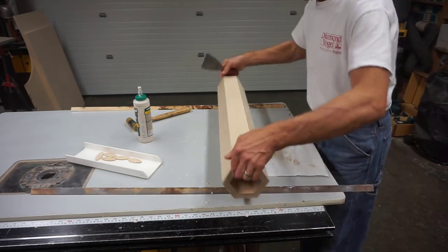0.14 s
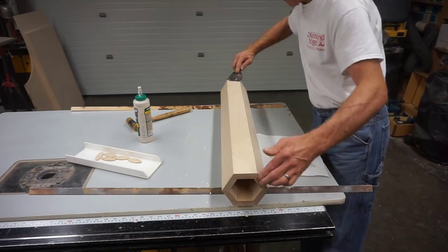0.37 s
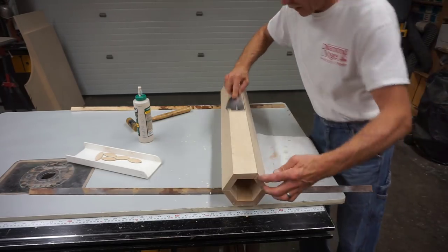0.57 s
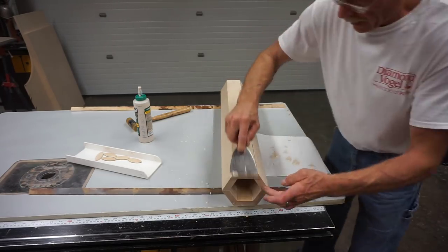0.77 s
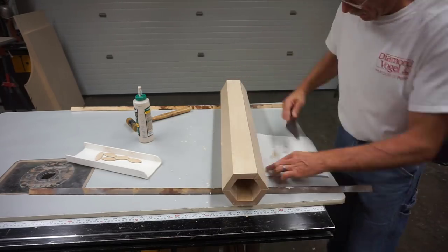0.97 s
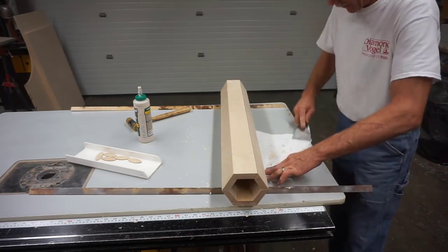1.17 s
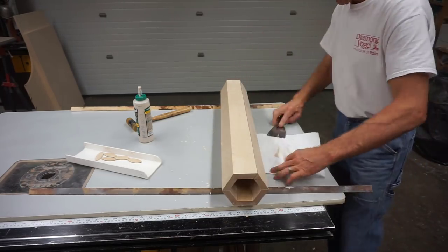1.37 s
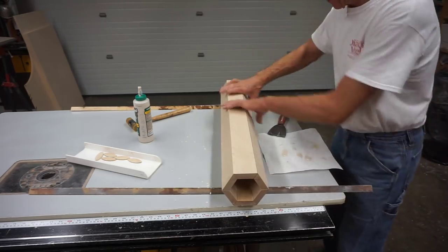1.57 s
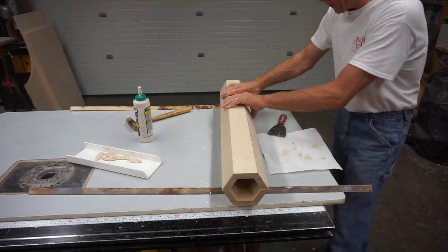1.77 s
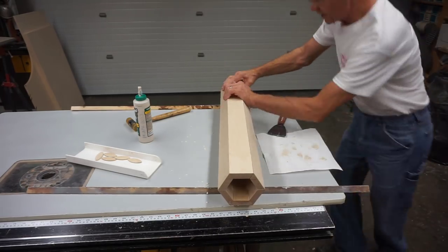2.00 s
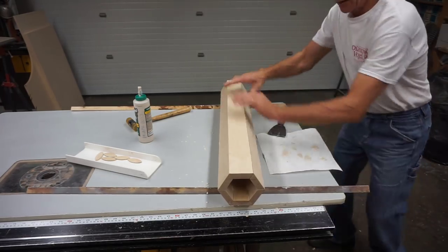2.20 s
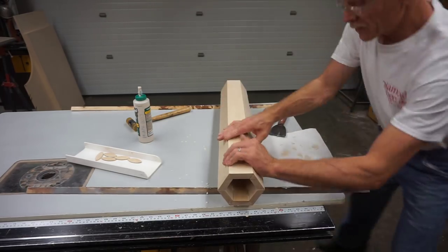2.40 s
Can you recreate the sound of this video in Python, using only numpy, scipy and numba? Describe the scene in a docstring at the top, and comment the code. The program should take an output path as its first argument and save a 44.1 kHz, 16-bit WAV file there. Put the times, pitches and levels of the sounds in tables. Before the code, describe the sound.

A putty knife scrapes along a wooden tube, then clatters down, followed by hollow knocks.

```python
"""A putty knife scrapes wet glue along a hollow wooden tube in one stick-slip stroke, after
clattering on to it. The blade is wiped on a paper towel, singing faintly, and dropped on the bench,
where the steel rings. Hands slide over the tube and roll it on to its next face with two hollow
knocks. A small workshop answers every sound with a short, dense echo, over faint hiss."""
import sys
import numpy as np
from scipy import signal
from scipy.fft import rfft, irfft, next_fast_len
from scipy.io import wavfile
from scipy.ndimage import uniform_filter1d
from numba import njit

SR = 44100
rng = np.random.default_rng(int(sys.argv[2]) if len(sys.argv) > 2 else 0)


def unload_audio(sound):
    """Save the sound as a 16-bit wav file, at the path given as the first command line argument."""
    columns = np.transpose(np.atleast_2d(sound))
    # keep every value between -1 and 1, then stretch to whole-number steps
    steps = np.round(np.clip(columns, -1, 1) * 32767)
    wavfile.write(sys.argv[1], SR, steps.astype(np.int16))


N = 108045
T = np.arange(N) / SR


def amp(db):
    """Decibels to gain."""
    return 10 ** (np.asarray(db) / 20)


def on_log(hz, points):
    """Interpolate (freq_hz, value) points on a log-frequency axis."""
    freq_hz, values = np.array(points, float).T
    return np.interp(np.log(np.maximum(hz, 1)), np.log(freq_hz), values)


def unit(x):
    """Scale to rms 1."""
    return x / np.sqrt(np.mean(x ** 2) + 1e-20)


def decay(t, t60_s):
    """Exponential fall, 60 dB in t60_s."""
    return np.exp(-np.log(1000) * t / t60_s)


def drift(per_s):
    """Smooth random drift, spread near 1."""
    hold = int(SR / per_s)
    steps = np.repeat(rng.standard_normal(N // hold + 1), hold)[:N]
    return 1.2 * uniform_filter1d(steps, hold)


def colour(x, eq):
    """Minimum-phase filter through (freq_hz, gain_db) points."""
    n = next_fast_len(2 * N)
    gain = amp(on_log(np.arange(n // 2 + 1) * SR / n, eq))
    cepstrum = irfft(np.log(gain), n)
    cepstrum[1:n // 2] *= 2
    cepstrum[n // 2 + 1:] = 0
    return irfft(rfft(x, n) * np.exp(rfft(cepstrum)), n)[:N]


@njit
def resonance(x, centre_hz, width_hz):
    """Band-pass with a moving centre, unity peak gain."""
    out, band_state, low_state = np.empty(len(x)), 0., 0.
    for i in range(len(x)):
        g = np.tan(np.pi * centre_hz[i] / SR)
        damping = width_hz / centre_hz[i]
        band = (band_state + g * (x[i] - low_state)) / (1 + g * (g + damping))
        band_state = 2 * band - band_state
        low_state += 2 * g * band
        out[i] = damping * band
    return out


def ring(strikes, modes):
    """Damped modes excited by each (start_s, level_db) strike."""
    t, out = T[:SR // 2], np.zeros(N + SR)
    for start_s, level_db in strikes:
        i = int(start_s * SR)
        for hz, mode_db, t60_s in modes:
            out[i:i + len(t)] += amp(level_db + mode_db) / 10 * np.cos(2 * np.pi * hz * t) * decay(t, t60_s)
    return out[:N]


def contact(start_s, level_db, crack_s, snap=0.34):
    """One blow: a sharp snap and a brief, spectrally flat crack."""
    t = T[:SR // 20]
    crack = rng.standard_normal(len(t)) * np.exp(-t / crack_s)
    crack[0] += snap * np.linalg.norm(crack)
    for _ in range(3):  # whiten, then shorten again
        spectrum = rfft(crack)
        crack = irfft(spectrum / abs(spectrum), len(t)) * np.exp(-(t / (4 * crack_s)) ** 2)
    return amp(level_db) * np.pad(crack / np.linalg.norm(crack), (int(start_s * SR), N))[:N]


def blows(rows, crack_s, body_hz=900, bright_hz=5500, treble_hz=10000):
    """Contacts, each with its own body and treble shelves."""
    out = 0
    for start_s, level_db, body_db, treble_db, *_ in rows:
        shelves = [(body_hz, body_db), (2000, 0), (bright_hz, 0), (treble_hz, treble_db)]
        out += colour(contact(start_s, level_db, crack_s), shelves)
    return out


def slips(per_s, spread_db):
    """Friction: a dense train of tiny, uneven slips."""
    impulses = (rng.random(N) < per_s / SR) * rng.standard_normal(N)
    return unit(impulses * amp(spread_db * np.minimum(rng.exponential(size=N), 4)))


def rubbing(moves, eq):
    """Soft friction that swells and fades with each move."""
    power = 0
    for peak_s, rise_s, fall_s, level_db in moves:
        swell = np.exp(-np.where(T < peak_s, ((T - peak_s) / rise_s) ** 2, (T - peak_s) / fall_s))
        power += (amp(level_db) * swell) ** 2
    return unit(colour(slips(per_s=3500, spread_db=1.5), eq)) * np.sqrt(power)


# towel wipes: peak_s, rise_s, fall_s, level_db
TOWEL_WIPES = [(.02, 0.11, 0.067, -59.5), (.084, 0.0056, 0.01, -47.5), (.965, 0.043, 0.13, -60),
               (1.135, 0.016, 0.12, -54), (1.229, 0.02, 0.015, -40), (1.368, 0.02, 0.023, -43),
               (1.61, 0.034, 0.05, -55), (1.795, 0.018, 0.046, -48)]
# paper spectrum: freq_hz, gain_db
PAPER_EQ = [(100, -75), (300, -32.5), (1100, -11.5), (2000, -5.5), (3200, -7), (6500, -1), (10000, -2),
            (15000, -4.5)]
def towel_wipes():
    """Paper towel rustles under the blade."""
    return rubbing(TOWEL_WIPES, PAPER_EQ)


# hand moves: peak_s, rise_s, fall_s, level_db
HAND_RUBS = [(.10, 0.042, 0.016, -54.5), (.148, 0.018, 0.0066, -51), (1.12, 0.015, 0.0094, -45.5),
             (1.652, 0.024, 0.047, -49.5), (1.89, 0.015, 0.035, -43), (1.95, 0.016, 0.017, -47.5),
             (2.01, 0.012, 0.038, -47.5), (2.21, 0.019, 0.029, -49.5), (2.374, 0.02, 0.0093, -49)]
# skin-on-wood spectrum: freq_hz, gain_db
HAND_EQ = [(100, -36), (250, -15.5), (620, -2), (950, 8.5), (1400, -1), (3000, -3), (6500, -1), (10000, -7),
           (15000, -7.5)]
def hand_rubs():
    """Hands slide over the tube and the bench."""
    return rubbing(HAND_RUBS, HAND_EQ)


# blade strikes on the tube: start_s, level_db
CLATTER = [(0.2363, -3), (0.2434, 3), (.2456, 7), (0.25, 2), (.269, -1.5), (.277, 0.5), (.288, -1)]
# tube wall modes: pitch_hz, level_db, t60_s
WALL_MODES = [(392, -38, .18), (578, -40, .2), (636, -41, .22), (838, -37, .25), (1005, -37, .2),
              (1895, -33, .15)]
# steel-on-tube spectrum: freq_hz, gain_db
CLATTER_EQ = [(60, -23), (310, -20.5), (400, -7.5), (470, -16), (620, -4), (1000, -0.5), (3500, -4.5),
              (6000, -2), (9000, -7), (15000, -10)]
def blade_on_tube():
    """Steel clatters on the wood and rings the tube."""
    cracks = sum(contact(*hit, crack_s=0.00483, snap=0.084) for hit in CLATTER)
    return colour(cracks + ring(CLATTER, WALL_MODES), CLATTER_EQ)


# edge catches: start_s, pitch_hz, level_db, t60_s
EDGE_PINGS = [(.3755, 2480, -27, .045), (1.349, 1555, -45, .09), (1.349, 1990, -46, .1)]
def blade_pings(width_hz=110.):
    """The edge catches and the steel chatters in a short, rough ring."""
    out = 0
    for start_s, pitch_hz, level_db, t60_s in EDGE_PINGS:
        centre_hz = np.full(N, float(pitch_hz))
        band = resonance(rng.standard_normal(N), centre_hz, width_hz)
        chatter = unit(resonance(band, centre_hz, width_hz))
        out += amp(level_db) * chatter * (T > start_s) * decay(abs(T - start_s), t60_s)
    return colour(out, [(200, -48), (1400, -2.0)])


# scraping stroke: time_s, steel_db, glide_hz, wood_db
STROKE_PATH = [(0.384, -64, 5700, -70), (0.44, -41, 5750, -71), (.54, -33.5, 6000, -66),
               (.60, -34, 6060, -55.5), (0.633, -28.5, 6500, -55), (.68, -32.5, 6900, -57.5),
               (.735, -35, 6830, -70.5), (.77, -32, 7330, -58), (0.809, -35.5, 7300, -56.5),
               (0.831, -30.5, 6850, -47.5), (0.846, -60, 7600, -57)]
# blade resonances: start_hz, width_hz, gain_db, rise_share_per_s
BLADE_PEAKS = [(2050, 130, 2, 0), (2480, 240, 2, -.1), (4700, 260, 2, .22), (7900, 260, 5, .1),
               (12750, 450, 8, .08)]
# scraping steel spectrum: freq_hz, gain_db
STEEL_EQ = [(100, -76), (1300, -13.5), (2100, -2), (3700, -2), (8000, 1.5), (15500, 4)]
# rasping wood spectrum: freq_hz, gain_db
WOOD_EQ = [(130, -50), (400, -8.5), (540, -16), (930, 2.5), (6000, -31)]
def scrape(grit_db=1.3, flicker_db=2.8, wander_share=.015, glide_db=16):
    """The edge sticks and slips over gritty glue, driving blade and wood, then flicks off the end."""
    time_s, steel_db, glide_hz, wood_db = np.array(STROKE_PATH).T
    grit = amp(grit_db * drift(per_s=350))
    edge = slips(per_s=12000, spread_db=0.5) * grit
    elapsed_s = np.clip(T, time_s[0], time_s[-1]) - time_s[0]
    wavering = 0
    for start_hz, width_hz, gain_db, rise in BLADE_PEAKS:
        gain = amp(gain_db + flicker_db * drift(per_s=28))
        centre_hz = start_hz * (1 + rise * elapsed_s + wander_share * drift(per_s=28))
        wavering += gain * resonance(edge, centre_hz, float(width_hz))
    # one resonance sings out and climbs
    fade_in = np.interp(T, [0.6, 0.69], [0, 1])
    glide = amp(glide_db) * fade_in * resonance(edge, np.interp(T, time_s, glide_hz), width_hz=280.)
    steel = unit(colour(edge + wavering + glide, STEEL_EQ)) * amp(np.interp(T, time_s, steel_db))
    wood = unit(colour(edge, WOOD_EQ)) * amp(np.interp(T, time_s, wood_db))
    flick = colour(contact(start_s=.8305, level_db=-4, crack_s=0.005), STEEL_EQ)
    return (steel + wood) * (T > time_s[0]) * (T < time_s[-1]) + flick


# soft knock spectrum: freq_hz, gain_db
PRESS_EQ = [(230, -16), (380, 1.5), (520, -7), (1100, -2), (2000, 2), (15000, -9.5)]
def blade_press():
    """The blade is pressed on to the towel with a soft knock."""
    return colour(contact(start_s=1.0864, level_db=-11.5, crack_s=0.0027), PRESS_EQ)


# blade tone envelope: time_s, level_db
SING_LEVELS = [(1.225, -67.5), (1.42, -68)]
def blade_sing(pitch_hz=1950, wander_hz=6):
    """Dragged over the towel, the blade sings faintly."""
    time_s, level_db = np.array(SING_LEVELS).T
    hz = pitch_hz + wander_hz * drift(per_s=28)
    tone = unit(np.sin(2 * np.pi * np.cumsum(hz) / SR))
    return tone * amp(np.interp(T, time_s, level_db)) * (T > time_s[0]) * (T < time_s[-1])


# knife strikes on the bench: start_s, level_db, body_db, treble_db
KNIFE_DROP = [(1.4219, 3, -12.5, -11.5), (1.4503, 8, -6.5, 1.5), (1.464, 1, 1, 0.5), (1.47, -0.5, 1.5, 0.5)]
# knife modes: pitch_hz, level_db, t60_s
STEEL_MODES = [(1100, -27, .1), (1567, -23, .13), (1747, -25, .16), (1946, -27, .36), (3440, -22, .12),
               (4186, -25, .15), (5535, -34, .1)]
# knife-on-bench spectrum: freq_hz, gain_db
BENCH_EQ = [(60, -52), (250, -27.5), (390, -13.5), (480, -15), (1050, 1), (1700, 1.5), (2800, -1),
            (5700, 0.5), (7500, -9.5), (15000, -30)]
def knife_on_bench(ring_db=-1.5):
    """Blade and handle strike the bench; the steel rings on."""
    cracks = blows(KNIFE_DROP, crack_s=0.00177, body_hz=1340, bright_hz=3200, treble_hz=6000)
    steel = ring([(start_s, db + ring_db) for start_s, db, *_ in KNIFE_DROP], STEEL_MODES)
    return colour(cracks + steel, BENCH_EQ)


# paper and fingertip ticks: start_s, level_db
FINGER_TICKS = [(1.6539, -10.5), (1.867, -16), (1.973, -17.5)]
# tick emphasis: freq_hz, gain_db
TICK_EQ = [(2500, -3.5), (6300, 6), (8500, -1)]
def finger_ticks():
    """Paper and fingertips make tiny, crisp contacts."""
    ticks = sum(contact(*tick, crack_s=0.0018) for tick in FINGER_TICKS)
    return colour(colour(ticks, TICK_EQ), PAPER_EQ)


# tube landings: start_s, level_db, body_db, treble_db, pitch_hz, note_db
TUBE_ROLL = [(2.0272, -2.5, -0.5, -21, 594, -14), (2.030, 3.5, 7, 9, 619, -22.5),
             (2.1126, 2.5, -1, 11, 648, -13.5), (2.115, 4.5, 4.5, -5, 998, -19.5),
             (2.126, 6, -18.5, -0.5, 649, -24), (2.218, -34, -12, -14, 614, -34.5)]
# tube knock spectrum: freq_hz, gain_db
TUBE_EQ = [(60, -20.5), (200, -17), (310, -19), (390, -5), (480, -14), (630, 3.5), (1200, -4), (2000, 2.5),
           (5300, -1), (8000, -10), (15000, -21.5)]
def tube_knocks(hollow_t60_s=.13):
    """The tube drops from an edge on to a face; its hollow note depends on how it rests."""
    cracks = blows(TUBE_ROLL, crack_s=0.00243)
    walls = ring([(start_s, db + body_db) for start_s, db, body_db, *_ in TUBE_ROLL], WALL_MODES)
    hollow = sum(ring([(start_s, note_db)], [(pitch_hz, 0, hollow_t60_s)])
                 for start_s, *_, pitch_hz, note_db in TUBE_ROLL)
    return colour(cracks + walls + hollow, TUBE_EQ)


# workshop decay: freq_hz, t60_s
WORKSHOP_T60 = [(300, 0.38), (800, 0.1776), (5500, 0.1628), (14000, 0.17)]
def workshop_response(width, gap_s=0.00033, build_s=0.0075, smooth_hz=45):
    """Stereo echo of one spot: reflections thicken, then die away, the bass last."""
    t = T[:SR // 2]
    hz = np.fft.rfftfreq(len(t), 1 / SR)
    bands_hz = np.geomspace(250, 16000, 5)
    noise = rfft(rng.standard_normal((2, len(t))))
    tails = 0
    for band_hz, weights in zip(bands_hz, np.eye(len(bands_hz))):
        band = irfft(noise * on_log(hz, list(zip(bands_hz, weights))), len(t))
        tails += band * decay(t, on_log(band_hz, WORKSHOP_T60))
    spectra = rfft(tails * np.clip((t - gap_s) / build_s, 0, 1))
    power = uniform_filter1d(abs(spectra) ** 2, int(smooth_hz / hz[1]) * 2 + 1, axis=1)
    mid, side = spectra / np.sqrt(power)
    side *= amp(on_log(hz, width))
    fade_out = np.clip(4 - 10 * t, 0, 1)
    return irfft(np.array([mid + side, mid - side]), len(t)) * fade_out


# bass loss of the echo: freq_hz, gain_db
ECHO_EQ = [(130, -24), (270, 1)]
def workshop_echo(x, width, renew_s=.075):
    """The reflections shift as hands, tool and body move."""
    x = colour(x, ECHO_EQ)
    out, hop = np.zeros((2, N + SR)), int(renew_s * SR)
    for centre in range(0, N + hop, hop):
        i = np.arange(max(centre - hop, 0), min(centre + hop, N))
        piece = x[i] * np.cos(np.pi / 2 * (i - centre) / hop)
        echo = signal.fftconvolve(piece[None], workshop_response(width), axes=1)
        out[:, i[0]:i[0] + echo.shape[1]] += echo
    return out[:, :N]


def hiss():
    """Faint steady noise, mostly common to both channels."""
    eq = [(130, -41), (400, -20.5), (950, -5), (2000, -4.5), (6000, -12), (15000, -16)]
    left, right, common = (unit(colour(rng.standard_normal(N), eq)) for _ in range(3))
    return common + .5 * np.array([left, right])


def pan(x, left_minus_right_db):
    """Place a sound by level difference."""
    return x * amp(np.array([[.5], [-.5]]) * left_minus_right_db)


# echo width of knocks: freq_hz, side_db
KNOCK_WIDTH = [(500, -24.5), (1100, -14.5), (5000, -4), (14000, -1)]
# wider stereo spread around the quiet scraping and rubbing: freq_hz, side_db
QUIET_SPREAD = [(400, -15), (1100, -3.5), (5000, -0.5)]
def scene():
    """Every source direct and by way of the room, over hiss."""
    blade, bench, tube = blade_on_tube(), knife_on_bench(), tube_knocks()
    stroke = scrape() + blade_pings()
    handling = finger_ticks() + towel_wipes() + hand_rubs() + blade_sing() + blade_press()
    direct = pan(blade + bench + tube + stroke, -0.9) + pan(handling, -3.5)
    knock_send = blade * amp(5.5) + bench * amp(3.5) + tube * amp(-1)
    friction_send = stroke * amp(-5) + handling * amp(0.5)
    echo = workshop_echo(knock_send, KNOCK_WIDTH) + workshop_echo(friction_send, QUIET_SPREAD)
    return direct + echo + amp(-63) * hiss()


def record(dry):
    """Steep low-pass at 15.7 kHz."""
    return signal.sosfilt(signal.ellip(10, .2, 80, 15700, fs=SR, output="sos"), dry)


dry = scene()
out = record(dry)
unload_audio(out)
```